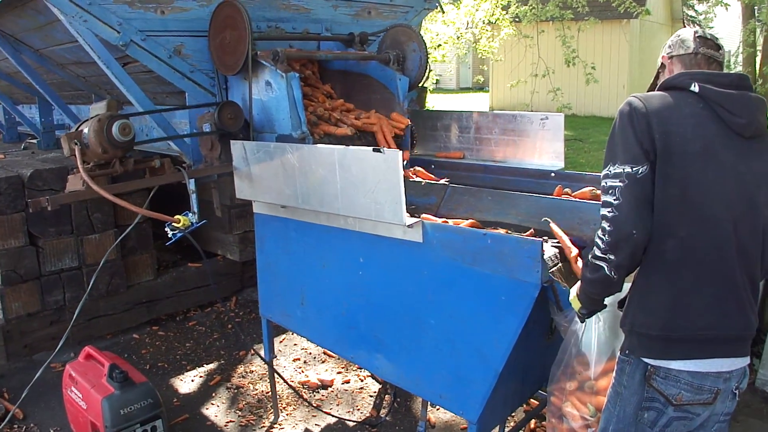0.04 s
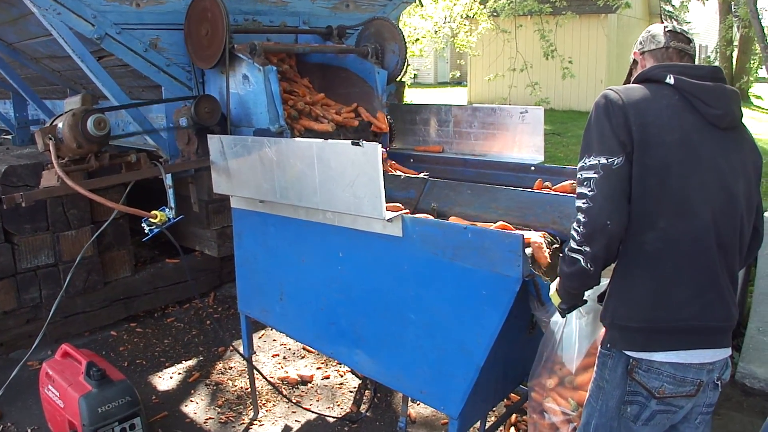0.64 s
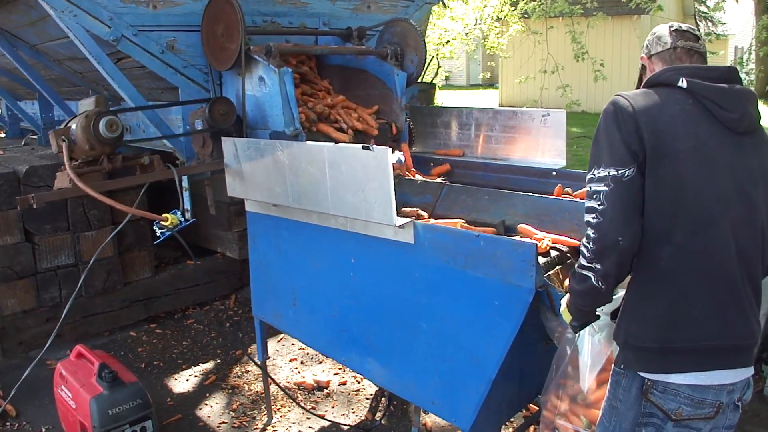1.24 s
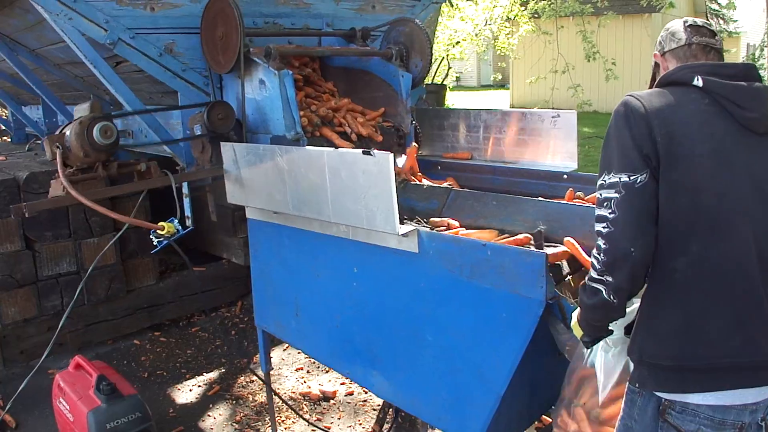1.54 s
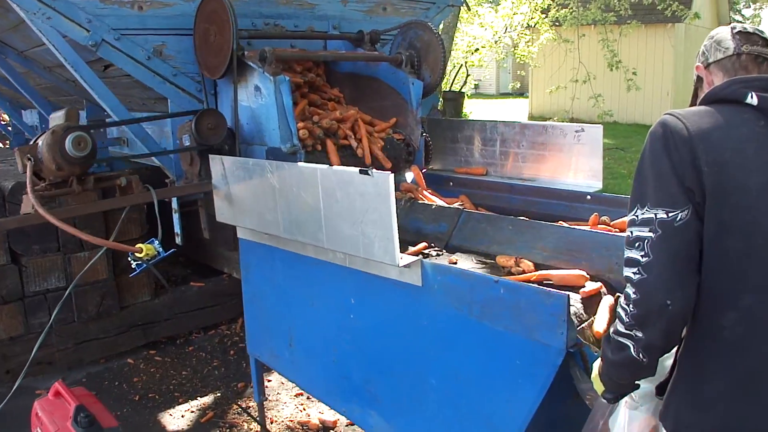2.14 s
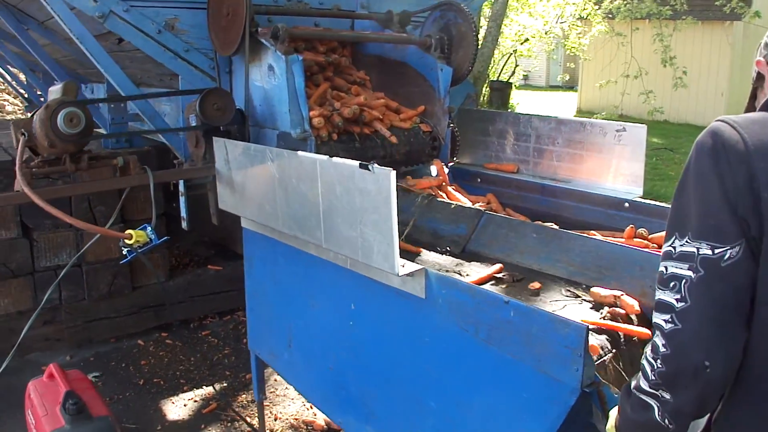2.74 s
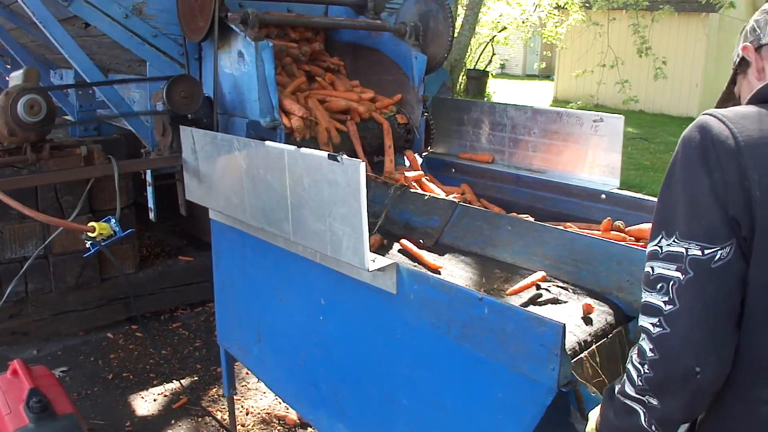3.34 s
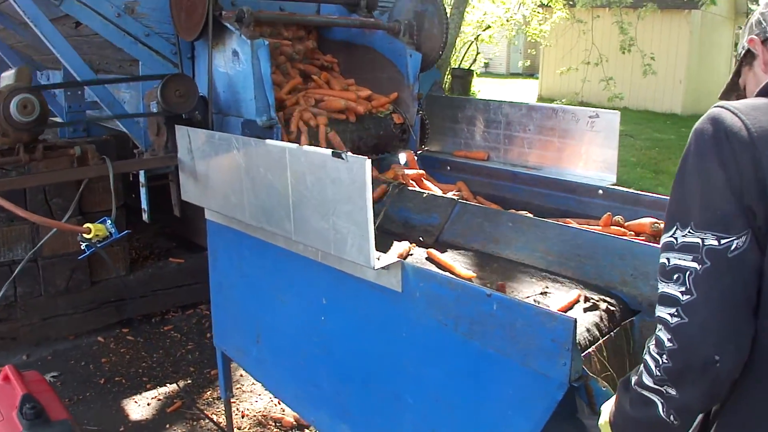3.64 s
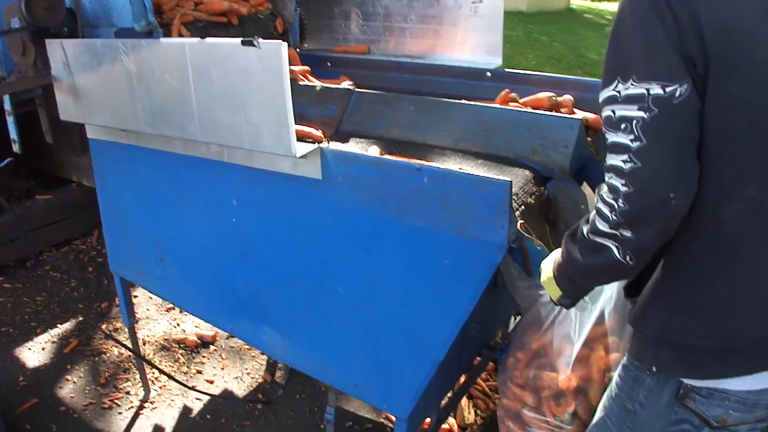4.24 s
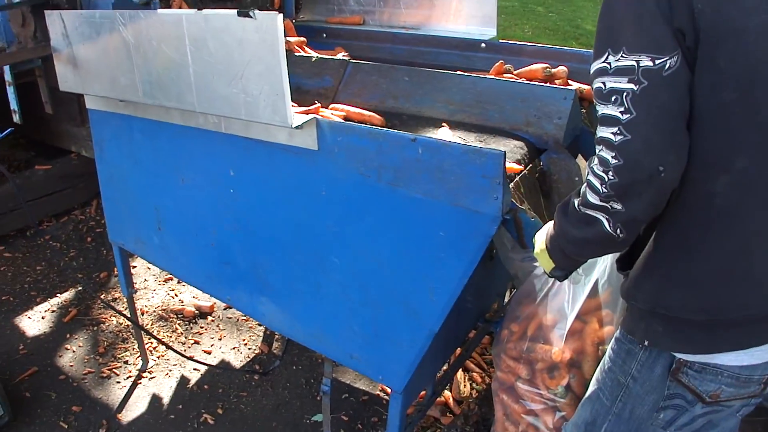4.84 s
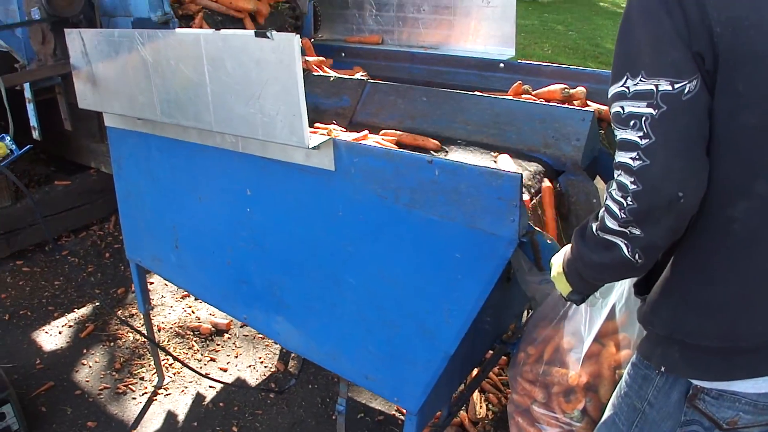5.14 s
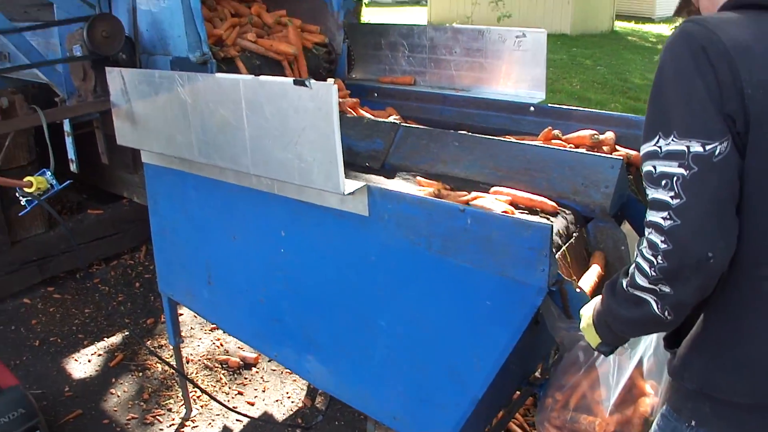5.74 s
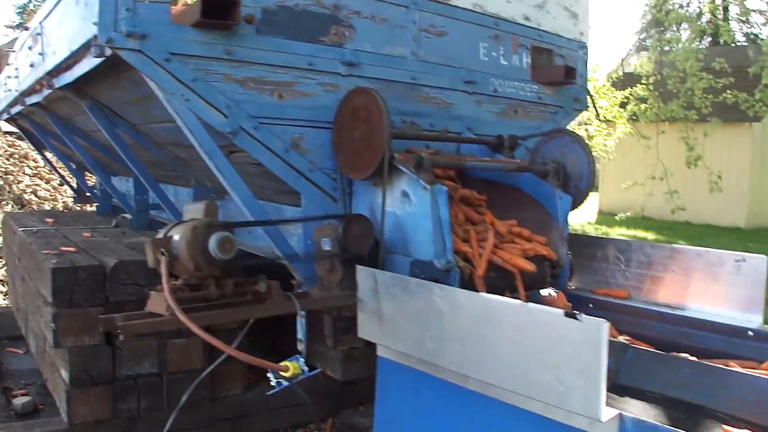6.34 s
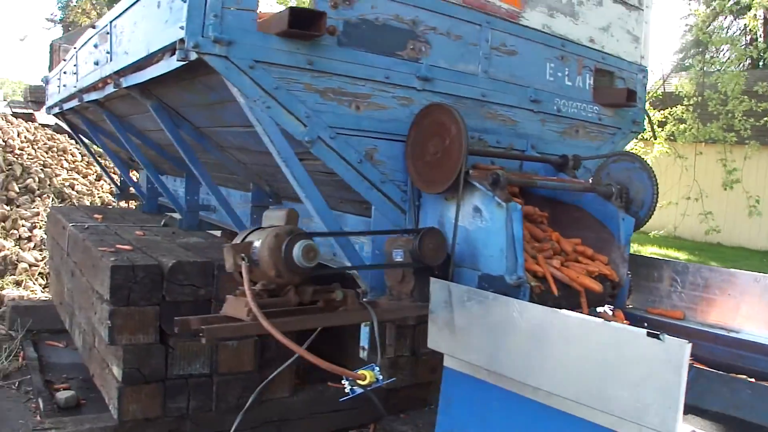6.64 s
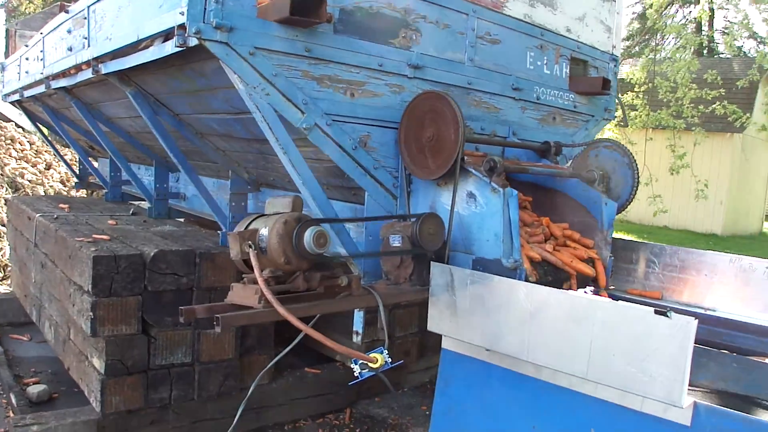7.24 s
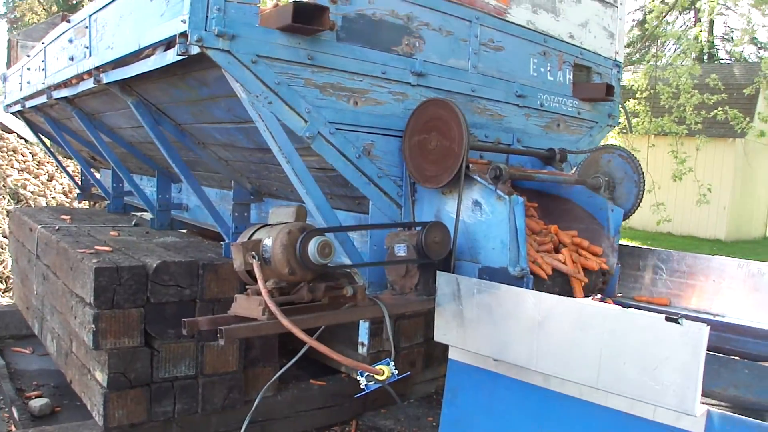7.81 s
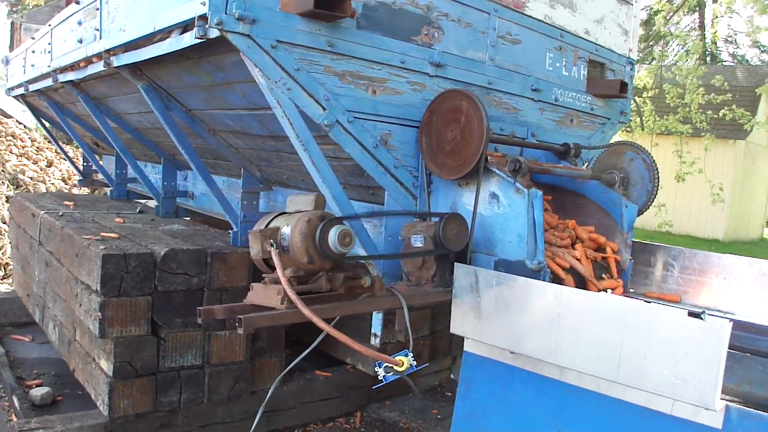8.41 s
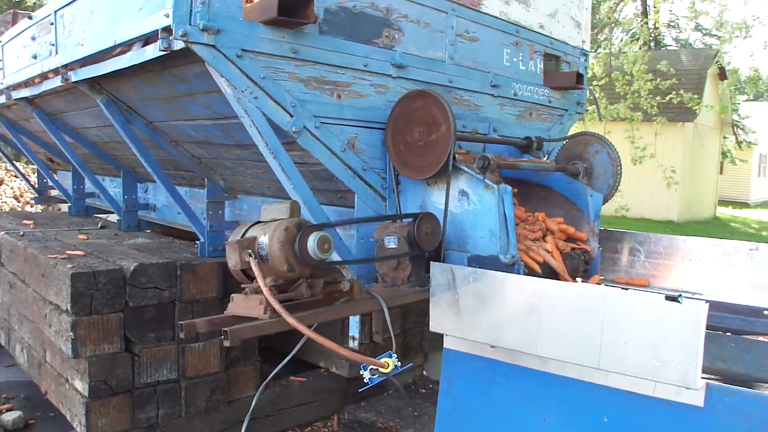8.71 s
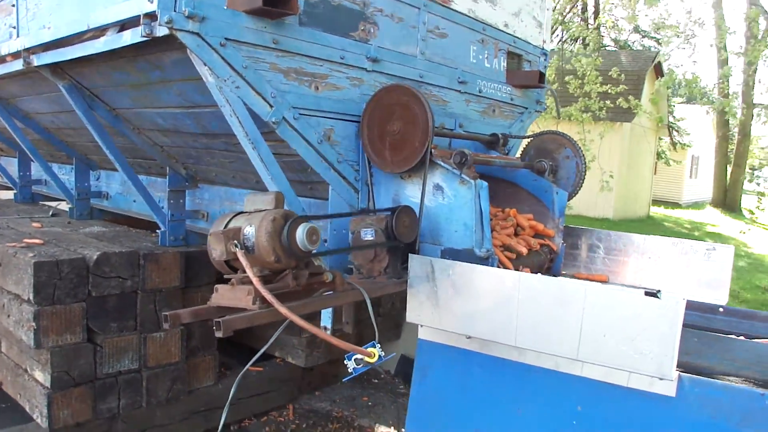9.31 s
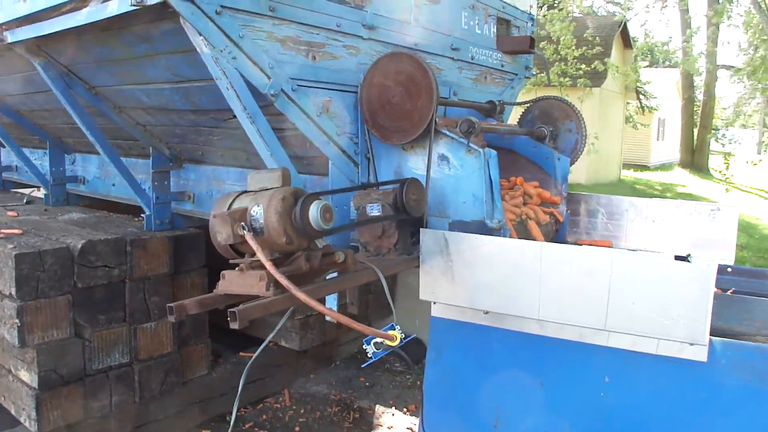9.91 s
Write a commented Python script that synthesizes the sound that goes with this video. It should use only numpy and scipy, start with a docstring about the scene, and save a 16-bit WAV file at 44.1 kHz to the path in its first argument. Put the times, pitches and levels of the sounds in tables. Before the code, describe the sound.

A carrot washer's motor rings and rattles steadily outdoors while carrots tumble and knock in a steel hopper under hissing water spray.

```python
"""A ringing, chattering, rattling drone: a carrot washer runs outdoors. Its electric motor rings once a
turn, the belt pulley rubs its guard hard twice a turn, and loose steel buzzes and clacks. Carrots tumble
and knock in the steel hopper, spray hisses and splashes on them, and a small generator hums. Faint
falling whistles and a few dry, bright clicks sound early on. After six seconds the microphone moves
toward the motor, the level dips briefly, and a few low puffs of air reach it."""
import sys
import numpy as np
from scipy import signal
from scipy.fft import rfft, irfft, next_fast_len
from scipy.io import wavfile
from scipy.ndimage import uniform_filter1d, minimum_filter1d, map_coordinates

SR = 44100
rng = np.random.default_rng(int(sys.argv[2]) if len(sys.argv) > 2 else 0)


def unload_wav(signal):
    """Save mono or channel-first audio to the path in sys.argv[1] as 16-bit WAV at rate SR, clipped to [-1, 1]."""
    wavfile.write(
        sys.argv[1],
        SR,
        np.round(np.clip(np.atleast_2d(signal).T, -1, 1) * 32767).astype(np.int16),
    )


N = 439677
TIME = np.arange(N) / SR


def amp(db):
    """Decibels to amplitude ratio."""
    return 10 ** (np.asarray(db) / 20)


def unit(x):
    """Normalisation to rms 1."""
    return x / np.sqrt(np.mean(x ** 2) + 1e-20)


def curves(rows):
    """Linear interpolation of each column after the time, one value per sample."""
    times, *columns = np.transpose(rows)
    return [np.interp(TIME, times, column) for column in columns]


def wobble(rate):
    """Smooth random modulation: a spline through rate knots a second."""
    return map_coordinates(rng.standard_normal(int(N * rate / SR) + 4), [TIME * rate])


def bump(time_s, half_s):
    """A Gaussian envelope around one moment."""
    return np.exp(-.5 * ((TIME - time_s) / half_s) ** 2)


def lobe(turns, place, width):
    """Periodic modulation: a Gaussian pulse at one place in every turn."""
    return np.exp(-.5 * (((turns - place + .5) % 1 - .5) / width) ** 2)


def grains(rate, spread_db):
    """Shot noise: two rows of tiny random contacts, rate a second, at rms 1."""
    hit = rng.random((2, N)) < rate / SR
    return unit(hit * np.sign(rng.standard_normal((2, N))) * amp(spread_db * rng.standard_normal((2, N))))


def sprinkled(rate, level_db, spread_db):
    """A Poisson process of rate blows a second, as rows of time_s, level_db."""
    gaps, sizes = rng.random((100, 2)).T
    times = np.cumsum(-np.log(1 - gaps)) / rate
    return [(s, level_db + spread_db * (2 * size - 1)) for s, size in zip(times, sizes) if s < TIME[-1]]


def impulses(rows):
    """An impulse train from rows of time_s, level_db."""
    return np.bincount([int(s * SR) for s, db in rows], [amp(db) for s, db in rows], N)


def strokes(rows, attack_s, t60_s):
    """Envelope of blows that rise and decay exponentially."""
    t = np.arange(SR // 2) / SR
    shape = (1 - np.exp(-t / attack_s)) * amp(-60 * t / t60_s)
    return signal.fftconvolve(impulses(rows), shape / shape.max())[:N]


def filtered(x, response):
    """Linear filtering: the spectrum of x times a frequency response."""
    size = next_fast_len(N + SR // 2)
    return irfft(rfft(x, size) * response(np.fft.rfftfreq(size, 1 / SR)), size)[..., :N]


def coloured(x, spectrum):
    """Spectral shaping by frequency_hz, level_db points on a log axis, at rms 1."""
    points_hz, db = np.transpose(spectrum)
    return unit(filtered(x, lambda hz: amp(np.interp(np.log(hz + 1), np.log(points_hz), db))))


def ringing(x, modes):
    """Forced resonance, at rms 1: a body radiates little below or above its range of modes."""
    def response(f):
        peaks = sum(amp(db) * 1j * f * width / (hz * hz - f * f + 1j * f * width)
                    for hz, width, db in modes)
        low_hz, high_hz = .7 * modes[0][0], 1.2 * modes[-1][0]
        return peaks / (1 + (low_hz / (f + 1)) ** 6) / (1 + (f / high_hz) ** 8)
    return unit(filtered(x, response))


def steadied(x, share):
    """Amplitude limiting: a loose part hits its stops, which evens its swing; it radiates no bass."""
    envelope = np.abs(signal.hilbert(x, next_fast_len(N))[:N])
    even = x / (envelope + .15) ** share
    return unit(filtered(even, lambda hz: 1 - np.exp(-(hz / 600) ** 4)))


def placed(pair, left_db, width):
    """Stereo level difference: direct sound (first row) with a share of scattered sound (second row)."""
    direct, scattered = pair
    balance = amp([[left_db / 2], [-left_db / 2]])
    return np.array([direct + width * scattered, direct - width * scattered]) * balance


def heard(far_db, near_db):
    """Level rises with nearness: a part's gain as the microphone moves toward the motor."""
    # path from the sorting belt to the motor: time_s, share_of_way
    walk = [(0, 0), (5.9, 0), (7.4, 0.81), (9.97, 0.83)]
    return amp(np.interp(curves(walk)[0], [0, 1], [far_db, near_db]))


def shafts():
    """Phase is the integral of speed: turns made so far by the motor and the pulley."""
    # shaft speeds, sagging briefly under load: time_s, motor_hz, pulley_hz
    speeds = [(0, 29.755, 7.973), (1, 29.47, 7.806), (1.5, 29.098, 7.688), (2, 29.797, 7.894),
              (3, 29.649, 7.895), (5, 29.735, 7.897), (7, 29.649, 7.916), (10, 29.8, 7.896)]
    motor_hz, pulley_hz = curves(speeds)
    return np.cumsum(motor_hz) / SR - .372, np.cumsum(pulley_hz) / SR - .098


def motor(turns):
    """Forced vibration: a worn bearing ticks and grinds into the mount, whose ring swells once a turn."""
    # the mount's upper and lower mode clusters: frequency_hz, bandwidth_hz, gain_db
    upper_modes = [(1712, 17, 9.5), (1733, 17, -1), (1690, 37, -27)]
    lower_modes = [(1630, 28, 0), (1605, 22, 4), (1694, 75, -4)]
    # relative strength of each cluster: time_s, upper_db, lower_db
    ring_levels = [(0, -24, -20), (1.2, -21, -24), (1.9, -20.5, -26), (2.6, -23, -23.5), (3.6, -20.5, -28),
                   (4.5, -22.5, -26.5), (5.7, -21.5, -25.5), (7.3, -29.5, -25), (8.5, -26, -26.5),
                   (9.97, -49, -26)]
    upper_db, lower_db = curves(ring_levels)
    tick_hz, jitter_s = 131.22, .0004
    count = int(N / SR * tick_hz)
    late, size = rng.standard_normal((2, count))
    tick_samples = np.clip((np.arange(count) / tick_hz + jitter_s * late) * SR, 0, N - 1).astype(int)
    bearing = unit(np.bincount(tick_samples, amp(2 * size), N)) + 1.2 * rng.standard_normal(N)
    upper = amp(upper_db + 1) * steadied(ringing(bearing, upper_modes), share=.26)
    lower = amp(lower_db - 1) * steadied(ringing(bearing, lower_modes), share=.15)
    # no two turns rub quite alike
    swell = unit(.7 + lobe(turns + .05 * wobble(30), place=.04, width=.15) * amp(2 * wobble(22)))
    return (upper + lower) * swell * amp([[1.7], [-1.9]])


def whine(turns):
    """Housing resonances sing thinly; the cooling fan adds two rough harmonics of the shaft rate."""
    # motor housing modes: frequency_hz, bandwidth_hz, gain_db
    modes = [(3210, 21, 7), (6770, 190, -2.5), (7580, 81, 4.5), (11020, 190, -4)]
    housing = ringing(rng.standard_normal((2, N)), modes) * unit(.73 + lobe(turns, place=.02, width=.16))
    housing = heard(far_db=-47, near_db=-36) * placed(housing, left_db=4, width=.2)
    fan = sum(np.sin(2 * np.pi * (order * turns + .2 * wobble(28))) * amp(3.5 * wobble(22))
              for order in (31, 32))
    return housing + heard(far_db=-38.5, near_db=-30.5) * fan * amp([[1.5], [-1.5]])


def pulley(turns, motor_turns):
    """Friction excites the belt guard's modes where the pulley rubs; pitch rises as the belt seats."""
    # rubs in each turn: place_turns, width_turns, slack_db, seated_db
    rubs = [(.31, .06, -2, -14), (.71, .05, -14, -1), (.995, .05, -1, 0)]
    # guard modes at the nominal pitch: frequency_hz, bandwidth_hz, gain_db
    guard_modes = [(910, 25, -22), (1092, 32, 9), (1138.4, 45, 9), (1220, 67, -9), (1660, 59, -10),
                   (2030, 100, -10)]
    nominal_hz, slack_hz, seated_hz = 1120, 1038.6, 1122.3
    seat_start_s, seat_end_s = .99, 2.0
    seated = np.interp(TIME, [seat_start_s, seat_end_s], [0, 1])
    rub = sum(amp(slack_db + seated * (seated_db - slack_db)) * lobe(turns, place, width)
              for place, width, slack_db, seated_db in rubs)
    # the belt catches when a rub meets the motor's heavy side
    catch = 1 + .62 * lobe(motor_turns, place=.033, width=.44)
    pressure = unit((.05 + rub) * catch * amp(1.2 * wobble(12)))
    chatter = steadied(ringing(grains(rate=4000, spread_db=1)[0], guard_modes), share=.7)
    pitch_hz = slack_hz + seated * (seated_hz - slack_hz)
    chatter = map_coordinates(chatter, [np.cumsum(pitch_hz / nominal_hz)], mode="mirror")
    return heard(far_db=-24.5, near_db=-21.5) * pressure * chatter * amp([[1.6], [-1.7]])


def frame(motor_turns, pulley_turns):
    """Contact noise: loose steel buzzes, amplitude-modulated by both shafts."""
    # the steel frame's response: frequency_hz, level_db
    spectrum = [(500, -36), (1000, -2.5), (1200, 6), (1300, -1.5), (1500, 3), (1700, 1), (1890, 4.5),
                (2070, -1.5), (2180, 1), (2500, -12.5), (2850, -15.5), (3220, -11), (3800, -28),
                (5000, -21), (12000, -39.5)]
    shake = .7 + .35 * lobe(motor_turns, place=0, width=.1)
    shake += .5 * lobe(pulley_turns, place=.7, width=.07) + .3 * lobe(pulley_turns, place=0, width=.06)
    rattle = coloured(grains(rate=2600, spread_db=4.5) * shake * amp(2.15 * wobble(18)), spectrum)
    return heard(far_db=-24, near_db=-23.5) * placed(rattle, left_db=4, width=.41)


def hopper():
    """Many soft impacts merge into noise: carrots roll in the drum, louder when a heap slides."""
    # deep rumble and midrange patter of the carrots: frequency_hz, level_db
    rumble_spectrum = [(20, -42), (45, -60), (90, -16.5), (150, -4.5), (240, 2.5), (320, 0.5), (450, -21),
                       (900, -11), (2000, -120)]
    tumble_spectrum = [(100, -27), (280, -9), (430, -1.5), (700, 0.5), (900, -3.5), (1300, 1.5), (1800, 1),
                       (3000, -23), (6000, -120)]
    # heaps sliding down the drum: centre_s, half_length_s, tumble_db, rumble_db
    slides = [(1.35, 0.19, -47, -46), (6.324, 0.23, -39, -40.5), (9.117, 0.29, -31.5, -45),
              (9.61, 0.21, -31.5, -67)]
    rumble = coloured(grains(rate=900, spread_db=3), rumble_spectrum)
    tumble = coloured(grains(rate=1800, spread_db=2.5) * amp(1.96 * wobble(16)), tumble_spectrum)
    rumble *= heard(far_db=-42.5, near_db=-42) + sum(amp(db) * bump(s, half) for s, half, _, db in slides)
    tumble *= heard(far_db=-26, near_db=-25) + sum(amp(db) * bump(s, half) for s, half, db, _ in slides)
    return amp(1.32) * (placed(rumble, left_db=-.5, width=.28) + placed(tumble, left_db=1.7, width=.13))


def water():
    """Drop impact noise: spray patters on wet produce in clumps, and larger slaps stand out."""
    # the loudest wet slaps: start_s, relative_level_db
    splashes = [(1.6247, -20), (2.0944, -15.5), (2.8504, -19), (2.954, -21), (4.5017, -19), (5.9958, -13),
                (8.31, -15.5), (8.5759, -12.5), (9.2179, -17), (9.4575, -14.5), (9.8271, -15)]
    # hiss of the spray: frequency_hz, level_db
    spectrum = [(1000, -56), (3000, -6.5), (4500, -9.5), (5400, -4), (6200, 2), (7200, 0.5), (7650, 2),
                (8200, 0.5), (9800, 0), (11100, -8.5), (12000, -37)]
    clump_decay_s = .0066
    arrivals = np.abs(grains(rate=35, spread_db=4.5)[0])
    clumps = signal.lfilter([1], [1, -np.exp(-1 / (clump_decay_s * SR))], arrivals)
    flow = heard(far_db=-35.4, near_db=-33.4) * unit(2.6 + unit(clumps)) * amp(.76 * wobble(4))
    slaps = list(splashes) + sprinkled(rate=3.4, level_db=-26.5, spread_db=7)
    force = flow + amp(-12) * strokes(slaps, attack_s=.0004, t60_s=.076)
    # random patches in frequency and time give every splash its own colour
    spectra = signal.stft(grains(rate=9000, spread_db=2.5), nperseg=256)[2]
    patches = uniform_filter1d(rng.standard_normal(spectra.shape[1:]), size=5, axis=0)
    patches = uniform_filter1d(patches, size=12, axis=1)
    drops = signal.istft(spectra * amp(2 * unit(patches)), nperseg=256)[1][:, :N]
    return placed(force * coloured(drops, spectrum), left_db=7.5, width=.28)


def generator():
    """Partials of a muffled engine waver together in frequency and amplitude."""
    # engine tones: pitch_hz, relative_level_db
    tones = [(147, -54), (228, -52), (274, -49), (456, -43.5)]
    clock = TIME + np.cumsum(.00794 * wobble(12)) / SR
    hum = sum(amp(db + 3) * np.sin(2 * np.pi * hz * clock) for hz, db in tones)
    return hum * amp(1.2 * wobble(5.7))


def whistles():
    """Faint tones glide downward, broken up by random amplitude modulation."""
    # thin whistles: start_s, end_s, start_hz, end_hz, level_db
    glides = [(.03, .8, 10700, 9650, -43), (.12, .32, 5380, 5150, -40), (.55, .85, 6200, 5800, -43),
              (1.4, 1.98, 4780, 4300, -49)]
    out = np.zeros(N)
    for start, end, start_hz, end_hz, db in glides:
        pitch_hz = np.interp(TIME, [start, end], [start_hz, end_hz]) * (1 + .007 * wobble(200))
        fade = np.interp(TIME, [start, start + .029, end - .04, end], [0, 1, 1, 0])
        out += amp(db) * fade * np.sin(2 * np.pi * np.cumsum(pitch_hz) / SR)
    return out * amp(4 * wobble(36)) * amp([[1.5], [-1.5]])


def clacks():
    """Impulse response of damped modes: loose steel strikes and rings for a few milliseconds."""
    # the loudest strikes: start_s, peak_db
    strikes = [(.177, -7), (1.533, -6), (2.263, -7), (2.682, -3), (2.957, -5), (3.189, -6), (4.198, -4),
               (4.67, -2.5), (5.202, -7), (7.363, -7), (7.835, -4), (8.089, -7)]
    # modes of the loose steel: frequency_hz, bandwidth_hz, gain_db
    modes = [(1150, 140, -1), (1700, 170, 0), (2200, 170, -7)]
    blows = impulses(strikes + sprinkled(rate=.86, level_db=-18, spread_db=6))
    ring = ringing(blows, modes)
    return ring / np.abs(ring).max() * blows.max() * amp([[1.5], [-1.5]])


def knocks():
    """Free vibration: a carrot sets a steel panel's modes ringing; a harder blow adds more crack."""
    # carrots landing: start_s, relative_level_db, pitch_hz, hardness_db
    landings = [(1.338, -13.5, 460, 2), (2.581, -14.5, 677, 4), (2.953, -10, 786, 12),
                (3.081, -11, 571, -8), (3.114, -9.5, 646, -14), (8.57, -13, 565, 6),
                (8.961, -8.5, 760, -12), (9.694, -2.5, 718, -14)]
    # the panel's modes: pitch_ratio, gain
    modes = [(.88, .29), (1, .89), (1.14, 0.44), (1.7, .27)]
    # the crack of contact: frequency_hz, level_db
    crack_spectrum = [(150, -32), (600, -4), (1300, 6), (2200, -8), (3300, -25), (8000, -18)]
    attack_s, t60_s = .0026, .18
    panel, t = np.zeros(N + SR), np.arange(SR // 3) / SR
    envelope = (1 - np.exp(-t / attack_s)) * amp(-60 * t / t60_s)
    for s, db, hz, _ in landings:
        ring = sum(gain * np.sin(2 * np.pi * (hz * ratio * t + rng.random())) for ratio, gain in modes)
        panel[int(s * SR):][:len(t)] += amp(db - 5) * ring * envelope
    blows = strokes([(s, db + hard_db) for s, db, _, hard_db in landings], attack_s=.0011, t60_s=.084)
    crack = amp(-10) * blows * coloured(rng.standard_normal(N), crack_spectrum)
    return (panel[:N] + crack) * amp([[.8], [-.8]])


def clicks():
    """Broadband transients: noise bursts a few milliseconds long sound as dry, bright clicks."""
    # dry clicks: start_s, level_db
    bursts = [(1.3865, -16), (2.581, -20), (2.713, -22), (4.198, -20)]
    # their bright colour: frequency_hz, level_db
    spectrum = [(500, -15), (2500, 0), (5000, 0), (11000, -1)]
    noise = placed(coloured(rng.standard_normal((2, N)), spectrum), left_db=4, width=.3)
    return strokes(bursts, attack_s=.0002, t60_s=.007) * noise


def puffs():
    """Wind noise: low rushes of air, only weakly correlated at the two microphone ports."""
    # puffs of air: centre_s, half_length_s, relative_level_db
    gusts = [(6.671, .016, -19.5), (6.719, 0.013, -21.5), (6.797, 0.088, -29.5), (6.967, 0.02, -27.5),
             (7.018, .01, -21), (7.061, 0.0084, -21), (8.645, .05, -23.5)]
    # their low rush: frequency_hz, level_db
    spectrum = [(30, -37), (80, -22), (140, -4), (300, 4.5), (480, -2), (800, -6), (2000, -70)]
    swell = sum(amp(db - 2) * bump(s, half) for s, half, db in gusts)
    return swell * placed(coloured(rng.standard_normal((2, N)), spectrum), left_db=-4, width=1.5)


def scene():
    """Superposition: washer and clicks, whose level dips briefly, plus whistles, generator and puffs."""
    motor_turns, pulley_turns = shafts()
    drive = motor(motor_turns) + whine(motor_turns) + pulley(pulley_turns, motor_turns)
    steel = frame(motor_turns, pulley_turns) + clacks()
    bright_clicks = clicks()
    produce = hopper() + knocks() + water()
    dip_s, dip_half_s, dip_db = 6.93, .28, -3.5
    dip = amp(dip_db * np.exp(-((TIME - dip_s) / dip_half_s) ** 4))
    return dip * (drive + steel + bright_clicks + produce) + whistles() + generator() + puffs()


def record(dry):
    """Microphone response: the left port leads by a sample; three notches, a limiter and a band limit."""
    ported = np.array([dry[0], np.pad(dry[1], (1, 0))[:N]])
    notches = [(3000, 127), (4020, 138), (5010, 260)]  # frequency_hz, half_width_hz
    notched = filtered(ported, lambda f: np.prod(
        [((f - hz) / (f - hz - 1j * width)) ** 2 for hz, width in notches], axis=0))
    needed_gain = 1 / np.maximum(np.abs(notched).max(axis=0), 1)
    smooth_gain = uniform_filter1d(minimum_filter1d(needed_gain, size=200), size=200)
    return filtered(notched * smooth_gain, lambda hz: hz < 11650)


dry = scene()
out = record(dry)
unload_wav(out)
```